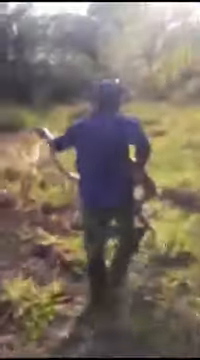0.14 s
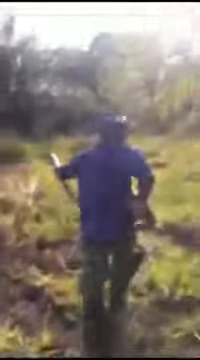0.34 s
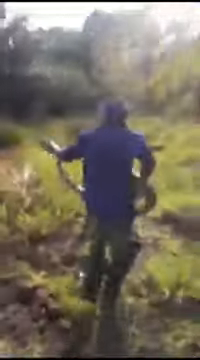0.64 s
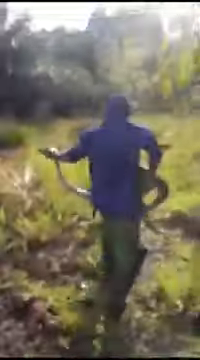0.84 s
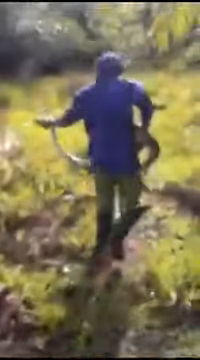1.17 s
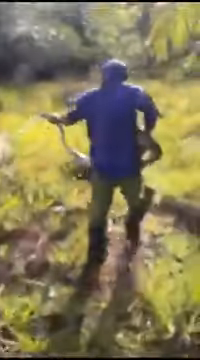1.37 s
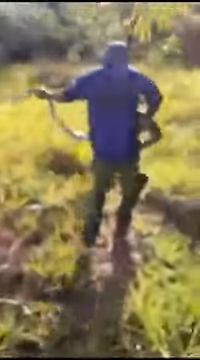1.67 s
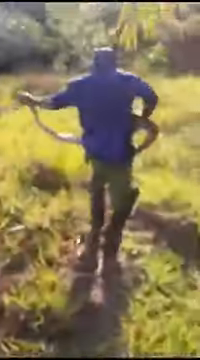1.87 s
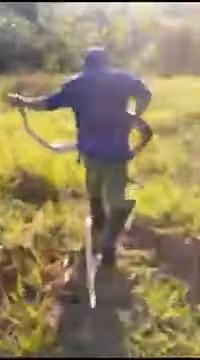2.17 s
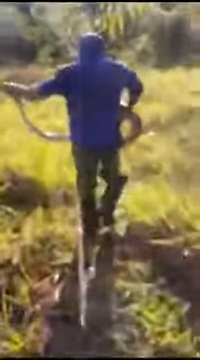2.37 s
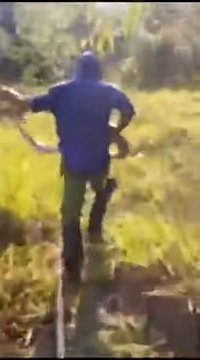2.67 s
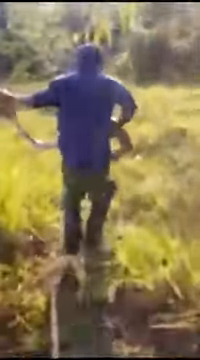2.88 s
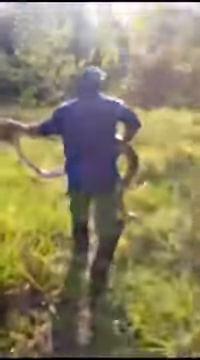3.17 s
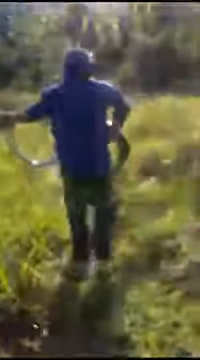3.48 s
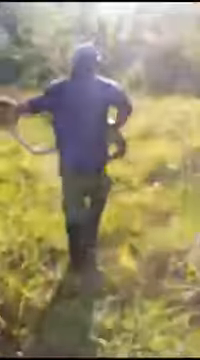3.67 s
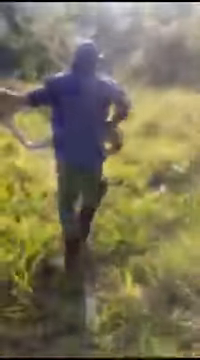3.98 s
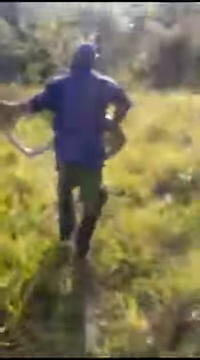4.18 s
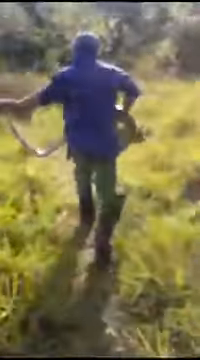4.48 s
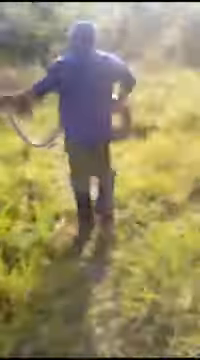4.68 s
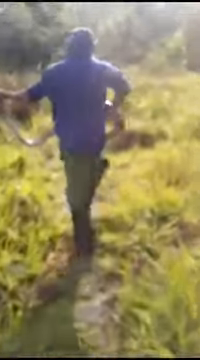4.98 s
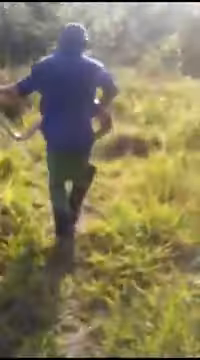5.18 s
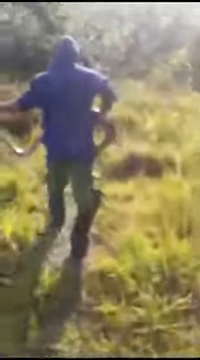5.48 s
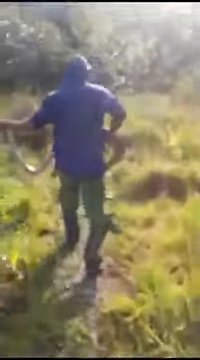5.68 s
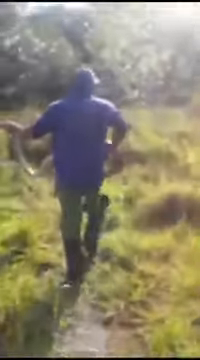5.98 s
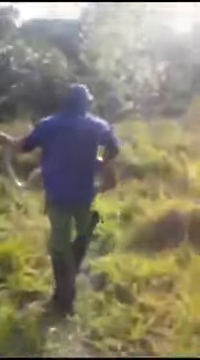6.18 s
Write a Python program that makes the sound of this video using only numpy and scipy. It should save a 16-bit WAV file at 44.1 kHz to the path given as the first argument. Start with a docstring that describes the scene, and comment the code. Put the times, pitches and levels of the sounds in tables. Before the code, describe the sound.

Close, dry, irregular rustling of legs pushing through long grass, picked up by a small handheld microphone in an open field. Short bird whistles open the scene, and bassy wind puffs bump the microphone through the first few seconds. Brittle stems snap singly and in quick clusters, thin blades flick, and boots knock softly on soil. A faint far engine drone fades away as the grassy crackle carries on.

```python
"""Legs swish through tall dry grass and stalks snap underfoot, while wind buffets the microphone,
most heavily early on. Two walkers cross a meadow; the one behind carries the microphone.
The grass is clumped scratchy noise in bands that swell apart; snaps, flicks and wind are shaped noise.
Boot thuds and wind buffets are decaying sines. A bird whistles nearby at the start in gliding sines,
and a far engine drones as one sine, slowly rising overall before it fades."""
import sys
import numpy as np
from scipy import signal
from scipy.fft import rfft, irfft, next_fast_len
from scipy.io import wavfile

SR = 44100
rng = np.random.default_rng(int(sys.argv[2]) if len(sys.argv) > 2 else 0)


def transcribe(u):
    """Save the signal u as a 16-bit wav file named by the first command-line argument.

    u: samples, shape (n,) or (channels, n), limited to [-1, 1]; the rate is SR.
    q: integer samples, one column per channel.
    """
    v = np.clip(np.atleast_2d(u).T, -1, 1)
    q = np.round(v * 32767).astype(np.int16)
    wavfile.write(sys.argv[1], SR, q)


N = 279594  # length in samples

# Legs swishing through the blades; rise and fall each span 10 dB of the floorless swell, roughly:
# peak_s, rise_s, fall_s, stalk_body_db, then over the body: leaf_sheen_db, near_treble_db, low_mid_tread_db
LEG_SWISHES = [(0.0, .02, 0.027, -45.5, -7.5, -13, -11), (0.113, 0.034, 0.029, -51, -20, -13, 0),
               (0.29, 0.021, 0.035, -36, -3, -1.5, -11.5), (0.395, 0.078, .1, -51, -5.5, -4, 3),
               (0.607, 0.16, 0.16, -53.5, 1, -4.5, -0.5), (0.794, .02, 0.085, -47.5, -3.5, 2, -7),
               (0.874, 0.045, 0.025, -43, -3, -2, -10.5), (1.058, 0.26, 0.12, -52, -3.5, -2.5, -5),
               (1.293, 0.0086, 0.048, -51.5, -6, -7, -29), (1.42, 0.026, 0.21, -47.5, 0.5, -0.5, -12.5),
               (1.54, 0.073, 0.069, -50.5, -12, -6, -10), (1.68, 0.29, 0.45, -53.5, -13, -21, -3.5),
               (2.02, 0.017, 0.085, -49.5, 2.5, 8, -1), (2.085, 0.065, 0.072, -40, -2, -1, -8.5),
               (2.51, 0.093, 0.063, -54, -2.5, -9.5, -15), (2.697, 0.088, .05, -47, -2.5, 2.5, -13.5),
               (2.842, 0.13, 0.088, -45.5, -6, -8, -5), (3.09, .012, .01, -46.5, 0, -10, -3.5),
               (3.109, 0.0081, 0.025, -38.5, -7, -6, -3.5), (3.21, 0.051, 0.09, -44.5, -1, 0.5, -7.5),
               (3.33, 0.11, 0.067, -50, -11, -5, -10), (3.416, 0.096, .04, -51, -11, -23, -2.5),
               (3.494, 0.043, 0.05, -46.5, -1, -6, -7.5), (3.664, 0.057, 0.029, -54, -0.5, 1.5, -15),
               (3.815, 0.019, 0.065, -41, 0.5, -0.5, -12.5), (3.955, 0.041, 0.053, -49, -2.5, -8, -3),
               (4.258, .025, 0.11, -51, 0, -2, -4), (4.422, .045, 0.1, -44.5, -2.5, -1.5, -10),
               (4.54, 0.13, 0.11, -59.5, -13, -2, 3), (4.7, 0.024, 0.026, -55.5, -11, -5, -7),
               (4.873, 0.11, 0.11, -56, 0.5, 2.5, -16), (4.975, 0.019, 0.06, -45, -3, -5, -20),
               (5.025, 0.05, 0.04, -47, -3, 1.5, -12), (5.156, 0.13, 0.11, -47, -6.5, -7.5, -7.5),
               (5.296, .06, 0.07, -56.5, -0.5, 5, 1), (5.423, 0.059, 0.038, -46, -0.5, -2.5, -3.5),
               (5.571, 0.048, 0.083, -46, -2.5, 1.5, -10), (5.651, 0.039, 0.042, -44.5, -5.5, -7, -9),
               (6.13, 0.083, 0.16, -47, -2, 1, -8.5), (6.338, 0.047, .05, -59, 3, -3, -4)]
# Steady rustle between swishes: time_s, stalk_body_db, treble_over_body_db, tread_over_body_db
STEADY_RUSTLE = [(0, -60.5, -5, 0.5), (.22, -63, 1, -1), (.7, -59, -8, 2), (1.25, -67.5, -12, -2.5),
                 (1.85, -63.5, 3.5, 0), (2.3, -58.5, -18, -1.5), (2.6, -71, 9, 0), (3.03, -63, -11, -6),
                 (3.35, -62, -6, -4), (3.73, -61, -8, -1), (4.1, -56, -6.5, -4), (4.35, -59.5, 3, -9),
                 (4.7, -58.5, -6, -4.5), (5.0, -61.5, -9, -3), (5.5, -57.5, -6, -2), (5.83, -54.5, 0, -5),
                 (6.05, -59, 1, -2.5), (6.34, -57, -4, -1.5)]
# Tone of the rubbing grass at the microphone: frequency_hz, gain_db
GRASS_TONE = [(200, -9), (350, -6.5), (750, -9), (1300, -12), (2400, -3), (3000, -7.5), (3900, -4.5),
              (4450, -7.5), (5000, -4.5), (6200, -12.5), (7500, -6.5), (9300, -21), (12500, -11),
              (15500, -13.5)]
# Stalks breaking; crackle and fray are relative to the ringing crack:
# start_s, core_peak_db, ring_hz, broad_crackle_db, treble_fray_db, length_ms
STALK_SNAPS = [(0.0249, -27.5, 3250, -27, -38, 4.9), (0.1054, -26, 3440, -1, -7, 7.6),
               (0.2854, -24, 2380, -7, -14, 5.2), (0.8593, -42, 2100, -3, -7, 4.7),
               (1.133, -26.5, 3180, -32, -37, 3.7), (1.285, -29.5, 2460, -6.5, -31, 6.9),
               (1.4088, -33, 5470, 10, 6, 5.1), (1.505, -31.5, 2970, -24, -34, 5.5),
               (1.5374, -34, 2660, 7, 2, 10), (1.9185, -33, 5300, 1.5, 7, 4.6),
               (1.938, -22, 2440, 12, -1, 5.4), (2.0924, -31, 3950, -14, -15, 4.5),
               (2.2542, -35, 3080, -22, -23, 4.7), (2.796, -31, 4760, -23, -27, 3.3),
               (2.831, -29, 2340, -7, -34, 4.6), (2.844, -33, 2520, -16, -23, 3.2),
               (3.0914, -33, 1970, 6, 5.5, 2.6), (3.1032, -18.5, 4900, 3, -8, 7.4),
               (3.109, -18, 5000, 18, -22, 4), (3.127, -38, 2370, 0, -14, 3), (3.155, -38, 1940, 0, 0, 5.3),
               (3.195, -47, 4000, 2, -5, 4.2), (3.2064, -35.5, 4030, -11, 1, 7.5),
               (3.3948, -35.5, 1800, -17, -31, 2.4), (3.4176, -23, 3120, -26, -38, 2.5),
               (3.7213, -25, 2840, -9.5, -16, 6.5), (3.7633, -29.5, 5500, 7, 0, 6.9),
               (3.784, -41, 5500, 0, 4, 3), (3.7884, -35.5, 5660, -10, 5, 3),
               (3.8064, -25.5, 5810, -17, -11, 4.3), (3.816, -27.5, 3870, -2, -24, 4.8),
               (3.834, -28, 1810, -15, -22, 3.9), (3.8562, -34, 4300, -16, -17, 7.3),
               (3.9513, -31, 5960, 15, -21, 3.3), (3.9832, -35, 3830, 5, -22, 3.8),
               (4.0083, -38, 5200, -6, -21, 3.8), (4.0587, -25, 3160, -31, -37, 2.7),
               (4.1766, -37.5, 3710, -2, -8, 4.2), (4.2509, -35, 5330, 10.5, 13, 8.3),
               (4.583, -30.5, 3120, -22, -24, 2.4), (4.8743, -35, 3420, -9, -7, 5.3),
               (4.9613, -29.5, 4520, 3, -22, 5), (4.972, -28, 4000, -15, -21, 5),
               (5.0533, -37, 3970, -21, -24, 4.2), (5.193, -28.5, 3060, -19, -26, 2),
               (5.368, -35.5, 3580, -7, -2, 6.4), (5.3984, -27.5, 4740, 2, -3, 5.6),
               (5.417, -25.5, 3600, -4, -4, 3.4), (5.436, -24.5, 5300, 2, -2, 4.2),
               (5.4898, -27.5, 7540, -3, -12, 3.3), (5.7368, -24, 3070, -14, -15, 2.7),
               (5.853, -35.5, 2770, -19, -23, 11), (6.1026, -35.5, 2260, 5, 11.5, 4.7),
               (6.3148, -37.5, 5000, -2, -13, 5.7)]
# Thin blades flicking close to the microphone: start_s, peak_db
BLADE_FLICKS = [(1.4075, -26), (2.1984, -41), (2.504, -35.5), (3.6421, -35), (4.9207, -41), (4.9468, -30),
                (5.1133, -44), (5.151, -30), (5.2074, -36), (5.6725, -31.5), (5.7029, -41)]
# Boots knocking soil and stems: start_s, level_db (before onset and decay), pitch_hz, t60_s
BOOT_THUDS = [(0.102, -33.5, 650, 0.033), (0.285, -24.5, 526, 0.018), (0.289, -24, 273, 0.02),
              (0.414, -35, 960, 0.02), (1.109, -37, 296, 0.014), (1.716, -13, 338, 0.0043),
              (1.937, -34, 735, 0.038), (2.085, -36, 237, 0.034), (2.33, -32, 198, 0.014),
              (2.795, -36, 450, 0.02), (2.842, -33.5, 447, 0.061), (2.885, -29, 444, 0.017),
              (3.101, -31, 800, 0.031), (3.467, -41, 484, 0.028), (3.722, -25.5, 348, 0.036),
              (3.764, -32, 335, 0.014), (4.634, -35.5, 293, 0.02), (5.401, -35, 458, 0.017),
              (5.434, -31.5, 790, 0.019), (5.736, -18.5, 925, 0.0062), (5.777, -39.5, 285, 0.029)]
# Puffs of wind and jolts on the microphone: peak_s, rise_s, fall_s, flutter_db, deep_rumble_db
WIND_GUSTS = [(0.09, .15, .15, -63.5, -74), (0.35, .09, 0.18, -53, -64), (0.49, 0.041, 0.041, -53, -49),
              (0.63, 0.052, .08, -50.5, -63), (0.71, 0.084, 0.14, -61, -55), (0.86, 0.041, 0.028, -40, -39),
              (1.0, 0.072, .05, -54.5, -54), (1.11, 0.058, 0.038, -52.5, -68), (1.16, 0.037, .04, -68, -58),
              (1.41, 0.035, .15, -56, -50), (1.6, 0.12, .05, -48, -42), (1.7, 0.037, 0.057, -51, -54),
              (1.96, .03, 0.026, -56.5, -69), (2.15, .12, 0.11, -54, -65), (2.35, 0.032, 0.045, -53.5, -70),
              (2.56, 0.046, 0.033, -65, -54), (2.65, 0.034, 0.11, -52.5, -49.5),
              (2.84, 0.043, 0.091, -53.5, -74), (3.11, 0.027, 0.037, -52, -71), (3.44, .09, .1, -55.5, -73),
              (4.02, 0.16, 0.18, -61.5, -75), (4.66, 0.17, .06, -56.5, -71),
              (5.17, 0.036, 0.098, -54.5, -75), (5.44, .08, 0.047, -59, -67),
              (5.81, 0.095, 0.056, -55, -75), (6.2, 0.18, .2, -65.5, -71)]
# Tone of the wind noise: frequency_hz, level_db (per Hz, relative)
WIND_TONE = [(18, -46), (30, 0), (81, 6.5), (146, 1), (297, -6), (372, -20), (497, -73), (517, -25),
             (700, -18), (910, -54), (1540, -120)]
# Single strong eddies pushing the capsule: start_s, level_db (before onset and decay), pitch_hz
WIND_BUFFETS = [(0.63, -24, 83), (0.809, -22, 83), (0.857, -13.5, 165), (1.402, -33, 80.7),
                (1.565, -21, 110), (1.597, -18.5, 139), (1.653, -27.5, 127), (1.7, -30, 83.4),
                (2.571, -28.5, 116), (2.633, -25, 115), (2.665, -33, 100), (2.699, -33, 106)]
# Bird notes, each a list of glide points: time_s, pitch_hz, level_db (before flutter)
BIRD_NOTES = [
    [(0, 2130, -56), (.012, 2060, -51), (.025, 2030, -68)],
    [(.135, 3050, -66), (.147, 2970, -51), (.158, 2420, -49), (.172, 2460, -62), (.178, 2450, -63)],
    [(.179, 2450, -68), (.189, 2250, -41.5), (.2, 2000, -57), (.206, 2000, -71)],
    [(.282, 2900, -44), (.29, 2530, -55), (.302, 2056, -37), (.32, 2420, -47), (.336, 2120, -50),
     (.345, 2150, -63)],
    [(.49, 2590, -52), (.515, 2740, -49), (.53, 2817, -44), (.56, 2773, -43), (.6, 2672, -43),
     (.63, 2740, -42), (.655, 2870, -44), (.675, 3020, -46), (.69, 2990, -64)],
]
# Breathy band under the whistles, perhaps a farther bird blurred by the trees: time_s, level_db
WHISTLE_HAZE = [(0, -57), (.1, -68), (.28, -78), (.33, -45), (.42, -54), (.48, -57), (.55, -50),
                (.66, -47.5), (.78, -55), (.9, -70), (1.1, -89), (1.3, -95)]
# Far engine: time_s, pitch_hz, level_db (before wavering)
ENGINE_DRONE = [(0, 89, -63), (1.2, 88.4, -59), (2.1, 92.5, -64.5), (2.9, 97.4, -60), (4.1, 100.2, -65.5),
                (4.8, 105.2, -72), (6.34, 104.3, -97)]
# Tone of the far air: frequency_hz, level_db (per Hz, relative)
MEADOW_TONE = [(76, -27), (130, -18), (158, -6.5), (357, -4.5), (1090, -15.5), (2420, -3.5), (4510, -10),
               (4930, -7), (5290, -9.5), (9000, -15), (11700, -94), (19800, -120)]


def sweep():
    """One rub heard in four parts; thick and thin blades make each narrow band swell on its own."""
    sheen_db, sheen_share = -2.5, 0.59  # steady sheen over the body; share of the treble's swing in it
    body_db, treble_db, tread_db = in_time(STEADY_RUSTLE)
    steady_sheen_db = sheen_db + sheen_share * treble_db
    steady_db = [body_db, body_db + steady_sheen_db, body_db + treble_db, body_db + tread_db]

    swish_db, *over_db = np.array(LEG_SWISHES)[:, 3:].T
    peaks_db = [swish_db] + [swish_db + db for db in over_db]
    gains = swells(LEG_SWISHES, peaks_db, steady_db)

    rub = colour(blades(400, spread_db=4, clump_db=1.8, smooth=2.2), GRASS_TONE)
    edges_hz = [280, 600, 1000, 1500, 1850, 2250, 2700, 3200, 3700, 4300, 4900, 5600,
                6500, 7400, 8500, 10000, 11500, 13000, 18000]
    bands = [narrow * from_db(2.5 * drift(30)) for narrow in split(rub, edges_hz)]
    body, sheen = rms_one(sum(bands[3:9])), rms_one(sum(bands[9:14]))
    treble, tread = rms_one(sum(bands[14:18])), rms_one(sum(bands[0:3]))
    return sum(gain * part for gain, part in zip(gains, [body, sheen, treble, tread]))


def blades(per_s, spread_db, clump_db, smooth):
    """Blades flick past in clumps as millisecond scratches of uneven size, over a smooth rub; rms 1."""
    clump = from_db(clump_db * drift(110))
    sizes = from_db(spread_db * np.minimum(rng.exponential(1, N), 4))
    starts = sizes * (rng.random(N) < per_s * clump / SR)
    fade = np.exp(-1 / (.001 * SR))  # 1 ms time constant
    scratches = rms_one(signal.lfilter([1], [1, -fade], starts))
    return rms_one((scratches + smooth * clump) * rng.standard_normal(N))


def snaps():
    """A stalk tears in a short noisy burst: it rings around one pitch, crackles broadly and frays on top."""
    first_break = 6.0  # height of the opening click against the tearing noise
    size = 2048
    out, t = np.zeros(N + size), np.arange(size) / SR
    click = first_break * (t == t[8])
    tears = rng.standard_normal((len(STALK_SNAPS), 3, size))
    for (s, peak_db, hz, broad_db, fray_db, ms), tear in zip(STALK_SNAPS, tears):
        length_s = ms / 1000
        shape = np.minimum(t / (0.061 * length_s), 1) * np.exp(-(t / length_s) ** 1.34)
        crack = rms_one(ring(ring((tear[0] + click) * shape, hz, 1050), hz, 1050))
        broad = rms_one(band(band(tear[1] * shape, 1600, 8200), 1600, 8200))
        fray = rms_one(ring(tear[2] * shape, 12800, 5000))
        core = crack + from_db(broad_db) * broad
        snap = (core + from_db(fray_db) * fray) / np.max(np.abs(core))
        at = round(s * SR)
        out[at:at + size] += from_db(peak_db) * snap
    return out[:N]


def flicks():
    """A thin blade flicks by as a tiny bright puff of noise that dies within a few milliseconds."""
    out, t = np.zeros(N), np.arange(400) / SR
    noises = rng.standard_normal((len(BLADE_FLICKS), len(t)))
    for (s, peak_db), noise in zip(BLADE_FLICKS, noises):
        puff = band(noise * np.exp(-t / 0.00047), 6500, SR / 2.2)
        at = round(s * SR)
        out[at:at + len(t)] += from_db(peak_db) * puff / np.max(np.abs(puff))
    return out


def thuds():
    """A boot knocks soil and stems, each knock ringing one dull mode."""
    return pushes(BOOT_THUDS, rise_s=0.00091)


def wind():
    """Lumpy low noise from eddies at the microphone port; large eddies rumble, small ones flutter."""
    calm_db = [-74.5, -70.5]  # flutter and rumble between the puffs
    eddies = colour(rng.standard_normal(N), WIND_TONE) * from_db(1.5 * drift(25))
    rumble, flutter = split(eddies, [25, 95, 900])
    flutter_gain, rumble_gain = swells(WIND_GUSTS, np.array(WIND_GUSTS)[:, 3:].T, calm_db)
    return flutter_gain * rms_one(flutter) + rumble_gain * rms_one(rumble)


def buffets():
    """A strong eddy pushes the capsule, a low sine with a soft onset and quick decay."""
    t60_s = 0.039
    return pushes([(*row, t60_s) for row in WIND_BUFFETS], rise_s=0.0039)


def bird():
    """Near sines that flutter in strength, with a haze of echoes from the trees."""
    whistle, t = np.zeros(N), np.arange(N) / SR
    for note in BIRD_NOTES:
        hz, level_db = in_time(note)
        sounding = (t >= note[0][0]) * (t < note[-1][0])
        whistle += sounding * from_db(level_db) * sine(hz)
    flutter_db = 2.7 * np.sin(2 * np.pi * 31 * t + 0.88) + 2.4 * drift(38)
    whistle *= np.sqrt(2) * from_db(flutter_db)  # sqrt(2): levels are rms
    echoes = rng.standard_normal(SR // 2) * from_db(-60 * t[:SR // 2] / .5)  # 60 dB down in 0.5 s
    echoes /= np.sqrt(np.sum(echoes ** 2))
    return whistle + from_db(-7.5) * signal.fftconvolve(whistle, echoes)[:N]


def haze():
    """A breathy band: noise passed twice through one resonance, drifting in level."""
    breath = ring(ring(rng.standard_normal(N), 2390, 410), 2390, 410)
    level_db = in_time(WHISTLE_HAZE)[0] + 1.8 * drift(23)
    return from_db(level_db) * rms_one(breath)


def drone():
    """The firing tone of a far engine, wavering in level as it crosses moving air."""
    hz, level_db = in_time(ENGINE_DRONE)
    return np.sqrt(2) * from_db(level_db + 0.57 * drift(13)) * sine(hz)


def meadow_air():
    """The far air of the meadow, a steady bed of coloured noise."""
    level_db = -61
    return from_db(level_db) * rms_one(colour(rng.standard_normal(N), MEADOW_TONE))


def pushes(table, rise_s):
    """A soft push sets one dull mode ringing: a sine with an eased onset and exponential decay."""
    out, t = np.zeros(N + 4096), np.arange(4096) / SR
    for s, level_db, hz, t60_s in table:
        at = round(s * SR)
        envelope = from_db(level_db - 60 * t / t60_s) * (1 - np.exp(-t / rise_s))
        out[at:at + len(t)] += envelope * np.sin(2 * np.pi * hz * t)
    return out[:N]


def swells(rows, levels_db, floors_db):
    """Each row swells and fades, powers adding over a floor; returns one gain curve per level column."""
    roundness = 1.2  # of a swell's top: 1 is pointed
    t = np.arange(0, N, 64) / SR
    s, rise_s, fall_s = np.array(rows)[:, :3].T[..., None]
    span_s = np.where(t < s, rise_s, fall_s)
    shape = from_db(-20 * (np.abs(t - s) / span_s) ** roundness)  # doubled dB value: this is power
    powers = from_db(2 * np.array(levels_db)) @ shape
    full_t = np.arange(N) / SR
    return [np.sqrt(np.interp(full_t, t, power) + from_db(2 * np.asarray(floor_db)))
            for power, floor_db in zip(powers, floors_db)]


def sine(hz):
    """A sine whose phase accumulates a moving pitch."""
    return np.sin(2 * np.pi * np.cumsum(hz) / SR)


def drift(rate_hz):
    """Slow chance: noise through a double one-pole low-pass, scaled to rms 1."""
    r = np.exp(-2 * np.pi * rate_hz / SR)
    noise = rng.standard_normal(N + SR)  # the first second lets the filter settle
    return rms_one(signal.lfilter([1], [1, -2 * r, r * r], noise)[SR:])


def ring(x, hz, width_hz):
    """A two-pole resonance with a gain of about 1 at its top."""
    r = np.exp(-np.pi * width_hz / SR)
    poles = [1, -2 * r * np.cos(2 * np.pi * hz / SR), r * r]
    return signal.lfilter([(1 - r * r) / 2, 0, (r * r - 1) / 2], poles, x)


def band(x, low_hz, high_hz):
    """Keep the sound between two frequencies."""
    return signal.sosfilt(signal.butter(3, [low_hz, high_hz], "band", fs=SR, output="sos"), x)


def split(x, edges_hz):
    """Bands between the edges that add up seamlessly, as differences of low-passes."""
    lows = [signal.sosfiltfilt(signal.butter(6, hz, fs=SR, output="sos"), x) for hz in edges_hz]
    return [upper - lower for lower, upper in zip(lows, lows[1:])]


def colour(x, spectrum):
    """Shape a signal's spectrum by frequency and dB points, joined along log frequency."""
    size = next_fast_len(N + 4096)
    hz = np.arange(size // 2 + 1) * SR / size + 1  # +1 avoids log of zero
    point_hz, point_db = np.array(spectrum).T
    gain = from_db(np.interp(np.log(hz), np.log(point_hz), point_db))
    return irfft(rfft(x, size) * gain, size)[:N]


def in_time(rows):
    """Draw each column after the time as a straight-line curve over the scene."""
    s, *columns = np.transpose(rows)
    return [np.interp(np.arange(N) / SR, s, column) for column in columns]


def from_db(db):
    """Decibels to amplitude."""
    return 10 ** (np.asarray(db) / 20)


def rms_one(x):
    """Scale to rms 1."""
    return x / np.sqrt(np.mean(x ** 2) + 1e-20)


def scene():
    """All sources reach one microphone, copied to two channels."""
    grass = sweep() + snaps() + flicks() + thuds()
    gusts = wind() + buffets()
    background = bird() + haze() + drone() + meadow_air()
    return np.tile(grass + gusts + background, (2, 1))


def record(dry):
    """The small capsule drops the deep bass; the top is cut steeply."""
    cutoff_hz = 15050
    thin = signal.sosfilt(signal.butter(3, 60, "high", fs=SR, output="sos"), dry)
    return signal.sosfilt(signal.ellip(12, .5, 70, cutoff_hz, fs=SR, output="sos"), thin)


dry = scene()
out = record(dry)
transcribe(out)
```